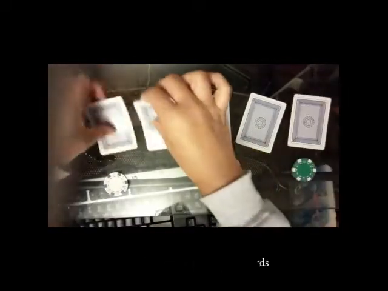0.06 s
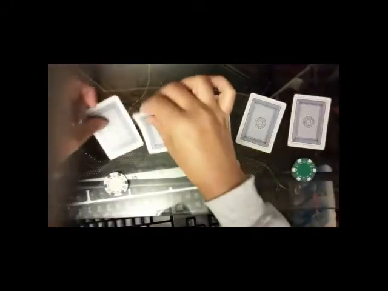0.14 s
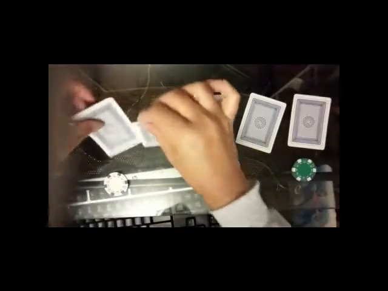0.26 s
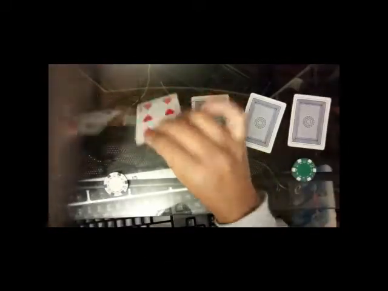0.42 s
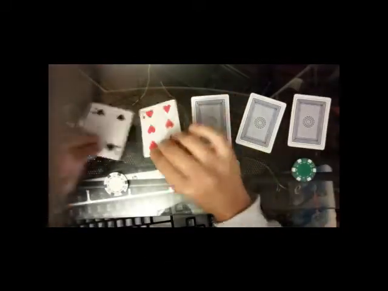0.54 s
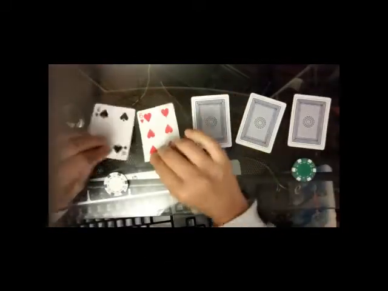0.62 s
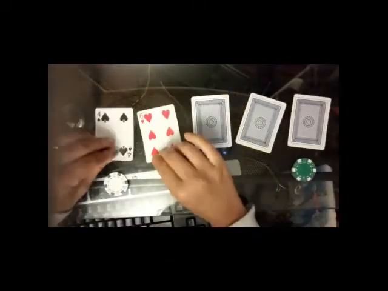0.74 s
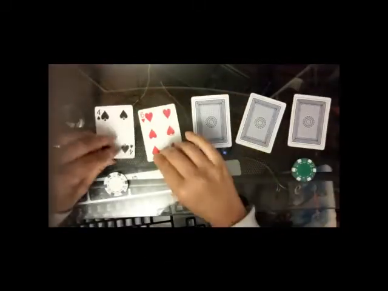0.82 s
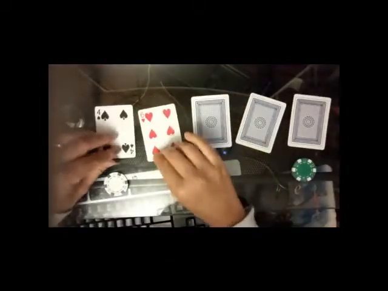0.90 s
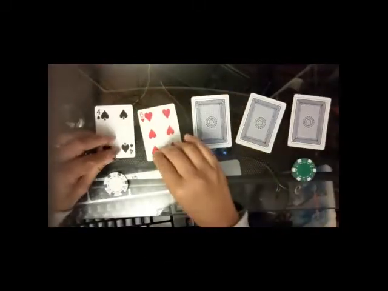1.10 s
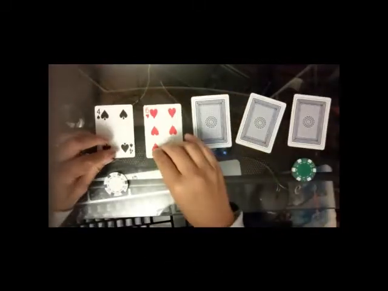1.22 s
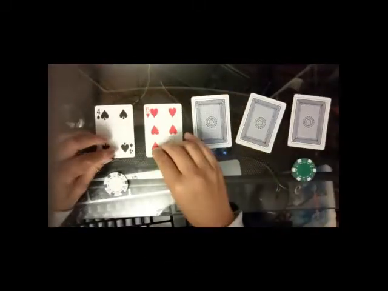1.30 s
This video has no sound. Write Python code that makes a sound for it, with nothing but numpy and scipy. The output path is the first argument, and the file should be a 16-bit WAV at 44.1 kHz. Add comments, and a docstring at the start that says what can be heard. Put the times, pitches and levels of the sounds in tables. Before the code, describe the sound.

A bent playing card cracks loose sharply, then cards tap and slide on a hard tabletop

```python
"""Playing cards are turned over on a hard table in a quiet room, close under a two-port phone.
A soft thud and scuff, faint cracks and taps come first; then a bent card snaps loose in a quick run of cracks.
The edges slide on, taps pop the air caught underneath, then more cracks, taps and scuffs follow close together.
Knuckles thud the table top throughout, and one last faint thud ends it.
A small room rings briefly over a faint hum and hiss."""
import sys
import numpy as np
from scipy import signal
from scipy.fft import rfft, irfft
from scipy.io import wavfile
from scipy.ndimage import map_coordinates

SR = 44100
rng = np.random.default_rng(int(sys.argv[2]) if len(sys.argv) > 2 else 0)


def output_pcm(signal):
    """Save a mono or channel-first signal as 16-bit PCM at the path in sys.argv[1].

    Samples are clipped to [-1, 1] before scaling.
    """
    pcm = np.clip(np.atleast_2d(signal).T, -1, 1) * 32767
    wavfile.write(sys.argv[1], SR, np.round(pcm).astype(np.int16))


def elevation(decibels):
    """Turn decibel levels (scalar or array-like) into linear amplitude ratios."""
    levels = np.asarray(decibels, float)
    return 10 ** (levels / 20)


N = 59535
SHORT, LONG, TAIL = 3000, 16000, 26000  # samples: cracks and taps, thuds and slides, room echoes


def unit(x):
    """Scales to an rms of one."""
    return x / np.sqrt(np.mean(x ** 2))


def colour(x, points, tilt_db=0):
    """Minimum-phase filter through (Hz, dB) points, tilted by dB per octave above 2 kHz."""
    f = np.maximum(np.arange(1025) * SR / 2048, 10)
    hz, gain_db = np.array(points, float).T
    db = np.interp(np.log(f), np.log(hz), gain_db) + tilt_db * np.log2(np.maximum(f, 2000) / 2000)
    cepstrum = irfft(np.log(elevation(db)))
    # folding the cepstrum forward in time makes the filter causal
    cepstrum[1:1024] *= 2
    cepstrum[1025:] = 0
    h = irfft(np.exp(rfft(cepstrum)))
    return signal.fftconvolve(x, h / np.sqrt(np.sum(h ** 2)))[:len(x)]


def band(x, lo_hz, hi_hz):
    """Band-pass filter."""
    sos = signal.butter(2, [lo_hz, min(hi_hz, .45 * SR)], "band", fs=SR, output="sos")
    return signal.sosfilt(sos, x)


def add(out, s, x):
    """Mixes x into out from s seconds on."""
    i = max(int(s * SR), 0)
    out[i:i + len(x)] += x[:N - i]


def grit(count, per_s, spread_db):
    """Dense clicks at random moments, uneven in size."""
    on = rng.random(count) < per_s / SR
    size = elevation(spread_db * rng.exponential(size=count))
    return on * rng.standard_normal(count) * size


# Hiss of the quiet room at the phone. Each row: frequency in Hz, relative density in dB per Hz.
AIR_COLOUR = [(12, -20), (25, -4), (60, -9), (120, -11), (300, -14), (500, -21), (1200, -25), (2200, -31),
              (5500, -31), (8000, -35), (15500, -36), (16500, -50)]
# Hum lines, one low and one high. Each row: centre in Hz, level in dB, width in Hz.
HUM_LINES = [(78, -69, 12), (11300, -94, 60)]


def air():
    """Room tone, alike at both ports in the bass, with two hum lines that waver as narrow noise bands."""
    air_db = -66.5
    shared, left, right = (colour(rng.standard_normal(N + SHORT), AIR_COLOUR)[SHORT:] for _ in range(3))
    low = signal.butter(1, 500, fs=SR, output="sos")
    bass = signal.sosfilt(low, shared)
    tone = np.array([bass + own - .5 * signal.sosfilt(low, own) for own in (left, right)])
    hum = np.zeros(N)
    for hz, db, width in HUM_LINES:
        line = band(rng.standard_normal(N + SR), hz - width / 2, hz + width / 2)
        hum += elevation(db) * unit(line[SR:])  # the first second lets the filter settle
    balance = elevation(np.array([[1.5], [-1.5]]))  # left a little louder
    return (elevation(air_db) * unit(tone) + hum) * balance


# Echoes of the small room. Each row: band centre in Hz, time to fall 60 dB in seconds, relative level in dB.
ROOM_BANDS = [(300, .4, -22), (1000, .4, -24), (3000, .4, -23), (9000, .3, -26)]


def room(x):
    """Diffuse echoes as decaying noise, band by band, other ones at each port."""
    t = np.arange(TAIL) / SR
    onset = np.minimum(t / .004, 1)

    def echoes():
        total = np.zeros(TAIL)
        for hz, t60, db in ROOM_BANDS:
            noise = unit(band(rng.standard_normal(TAIL), hz / 1.8, hz * 1.8))
            total += .03 * elevation(db) * noise * 1000. ** (-t / t60) * onset
        return total

    return np.array([signal.fftconvolve(x, echoes())[:N] for _ in range(2)])


# Knuckles on the table top, close by.
# Each row: start in seconds, relative level in dB, push time in seconds, tilt over the modes in dB per octave.
THUDS_PLAYED = [(.002, -42, .0008, 2), (.162, -48, .0006, 2), (.229, -38, .0004, 3), (.766, -49, .0006, 3),
                (.822, -39, .0004, 5), (.906, -40, .001, 1), (.945, -50, .004, -4), (1.017, -30, .0005, 3),
                (1.04, -42, .003, -3), (1.06, -42, .001, 0), (1.219, -54, .001, 1)]
# Low modes of the table top. Each row: frequency in Hz, level in dB, time to fall 60 dB in seconds.
TABLE_MODES = [(38, -10, .2), (62, -5, .15), (116, 0, .18), (165, -1, .1), (235, -1, .1), (300, -1.5, .15),
               (350, -4, .08), (430, -5, .06)]


def thuds():
    """A soft push rings the low modes of the table top, each mode taking an uneven share."""
    out, t = np.zeros(N), np.arange(LONG) / SR
    for s, db, push, tilt_db in THUDS_PLAYED:
        shares = elevation(1.5 * rng.standard_normal(len(TABLE_MODES)))
        ring = np.zeros(LONG)
        for share, (hz, mode_db, t60) in zip(shares, TABLE_MODES):
            gain = share * elevation(mode_db + tilt_db * np.log2(hz / 200))
            ring += gain * np.sin(2 * np.pi * hz * t) * 1000. ** (-t / t60)
        force = t / push * np.exp(-t / push)
        pushed = signal.fftconvolve(ring, force[:SHORT] / force.sum())[:LONG]
        add(out, s, -.4 * elevation(db) * pushed)  # first swing is negative
    return band(out, 22, 3000)


# Card edges and faces rubbing, close under the phone.
# Each row: start in seconds, attack in seconds, hold in seconds, release in seconds per 20 dB,
# relative level in dB, tilt in dB per octave above 2 kHz.
SLIDES_PLAYED = [(0, .002, .005, .09, -61, -3), (.162, .003, .055, .03, -55, 2),
                 (.224, .004, .022, .065, -35, -2.5), (.27, .04, .08, .02, -51, 0),
                 (.39, .01, .04, .06, -60, -2), (.735, .025, .004, .02, -67, 0),
                 (.828, .005, .035, .08, -57, -18), (.855, .06, .07, .05, -62, -2),
                 (.904, .005, .008, .02, -56, 1), (.99, .022, .004, .006, -43, 1),
                 (1.022, .006, .031, .01, -50, -1), (1.062, .003, .01, .11, -57, -2)]
# Colour of the rubbing. Each row: frequency in Hz, relative gain in dB.
RUB_COLOUR = [(180, -35), (400, -16), (700, -11), (1200, -4), (2000, -6), (2800, -5), (3800, -3),
              (4700, -10), (5700, 1), (6600, -9), (7800, -7), (10000, -9), (15200, -12), (16500, -31)]


def slides():
    """Card faces and edges rub: noise and fine grit, wavering as the edge catches and lets go."""
    grains_per_s, grain_db = 6000, 1.8
    catch_hz, catch_db = 150, 2  # fastest wavering, its rms depth
    out, t = np.zeros(N), np.arange(LONG) / SR
    for s, attack, hold, release, db, tilt_db in SLIDES_PLAYED:
        rise = np.minimum(t / attack, 1) ** 1.5
        fall = elevation(-20 * np.maximum(t - attack - hold, 0) / release)
        rub = rng.standard_normal(LONG) + .5 * unit(grit(LONG, grains_per_s, grain_db))
        catch = elevation(catch_db * unit(band(rng.standard_normal(LONG), 10, catch_hz)))
        add(out, s, elevation(db) * rise * fall * catch * unit(colour(rub, RUB_COLOUR, tilt_db)))
    return out


# Cards and fingertips tapping the table, close under the phone. Each row: start in seconds, relative level in dB,
# pitch in Hz, rise in seconds, tick in dB against the tap level, roughness from 0 to 1.
TAPS_PLAYED = [(.1415, -47, 700, .0015, -20, .6), (.162, -36, 635, .0008, -14, .3),
               (.549, -42, 725, .0022, -25, .35), (.547, -47, 1600, .002, -20, .3),
               (.636, -56, 738, .0025, -20, .4), (.7207, -38, 1330, .0015, -17, .2),
               (.7255, -49, 850, .002, -20, .4), (.7655, -40, 1080, .002, -16, .1),
               (.8226, -31, 550, .0015, -30, .35), (.8232, -30, 1150, .0018, -32, .4),
               (.8228, -28, 1950, .0016, -34, .25), (.97, -52, 1000, .002, -14, .6),
               (1.0095, -32, 1700, .003, -25, .4), (1.012, -37, 800, .003, -25, .8)]


def taps():
    """A tick, while the trapped air pops on a short rough tone that swells and dies."""
    tick_hz, tick_decay_s = 3000, .0012
    out, t = np.zeros(N), np.arange(SHORT) / SR
    for s, db, hz, rise, tick_db, roughness in TAPS_PLAYED:
        u = t / max(rise, 3e-4)
        swell = (u * np.exp(1 - u)) ** 1.5
        noise = rng.standard_normal(SHORT)
        rough = unit(band(band(noise, .55 * hz, 1.5 * hz), .55 * hz, 1.5 * hz))
        pop = swell * ((1 - roughness) * np.sin(2 * np.pi * hz * t) + roughness * rough)
        tick = unit(band(rng.standard_normal(SHORT), .4 * tick_hz, 1.8 * tick_hz))
        add(out, s, elevation(db) * (pop + elevation(tick_db) * tick * np.exp(-t / tick_decay_s)))
    return out


# Cracks of the cards, close under the phone.
# Each row: start in seconds, peak in dB before the ports, time to swell in seconds,
# tilt in dB per octave above 2 kHz.
CRACKS = [(.1411, -44, .0012, 2), (.1618, -41, .0008, 0), (.2226, -12.5, .0006, 0), (.2294, -7, .0010, -1),
          (.2414, -14, .0010, -1), (.5003, -54, .001, 3), (.5362, -60, .0006, 1), (.5458, -44, .001, -1),
          (.5486, -42, .0013, 0), (.7645, -45, .001, -4), (1.0102, -30, .0012, 3), (1.0136, -24, .0013, 4),
          (1.0555, -27, .0018, 3)]
# Ring of the card. Each row: frequency in Hz, relative gain in dB.
CARD_COLOUR = [(90, -40), (200, -13), (500, -8), (1100, -12), (1650, -1), (2200, -6), (2800, -5),
               (3600, -2), (4600, -7), (5600, -3), (7500, -9), (10000, -11), (15000, -12), (16500, -35)]


def snaps(rows):
    """Each crack is a few ms of clicks that swell and die, ringing the card."""
    out, t = np.zeros(N), np.arange(SHORT) / SR
    for s, db, length, tilt_db in rows:
        u = t / max(length, 2e-4)
        clicks = grit(SHORT, 20000, 1.5) * u * np.exp(1 - u)
        crack = colour(clicks, CARD_COLOUR, tilt_db)
        add(out, s, elevation(db) * crack / abs(crack).max())
    return out


def ports(source, lead_s):
    """The left port hears first and louder; each adds its own treble scattered off table top and hands."""
    left_db, scatter_db, scatter_hz = 3, -3, 2200  # left over right; scattered share, above this pitch
    high = signal.butter(2, scatter_hz, "high", fs=SR, output="sos")
    direct = source()
    heard = []
    for k in range(2):  # left, right
        late = map_coordinates(direct, [np.arange(N) - k * lead_s * SR], mode="nearest")
        scattered = signal.sosfilt(high, source())  # a fresh random draw of the same events
        heard.append(elevation(left_db * (.5 - k)) * (late + elevation(scatter_db) * scattered))
    return direct, np.array(heard)


def scene():
    """The lifted card's run of cracks, everything on the table, and the room around them."""
    flip_from_s, flip_to_s = .2, .3
    flip_lead_s, table_lead_s = .00006, .0002  # how much sooner the left port hears
    lifted = [row for row in CRACKS if flip_from_s < row[0] < flip_to_s]
    resting = [row for row in CRACKS if row not in lifted]
    flip, flip_heard = ports(lambda: snaps(lifted), flip_lead_s)
    top, top_heard = ports(lambda: snaps(resting) + slides() + taps(), table_lead_s)
    low = thuds()
    # the table shakes each port a little differently
    shake = .55 * low + .45 * np.array([thuds(), thuds()])
    return flip_heard + top_heard + shake + room(flip + top + low) + air()


def band_limit(x):
    """A steep low-pass at the top of the band."""
    return signal.sosfilt(signal.butter(12, 16980, fs=SR, output="sos"), x)


def record(dry):
    """The phone cuts the top of the spectrum steeply above 16.5 kHz."""
    top_cut = signal.ellip(8, .2, 70, 16500, fs=SR, output="sos")
    mix = signal.sosfilt(top_cut, dry)
    return band_limit(mix)


dry = scene()
out = record(dry)
output_pcm(out)
```